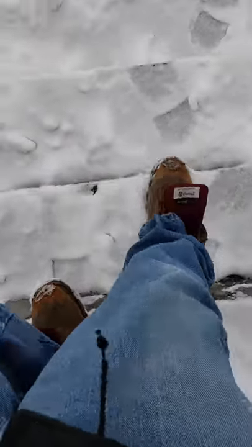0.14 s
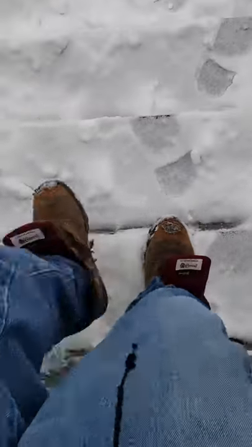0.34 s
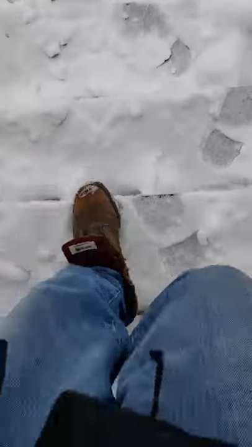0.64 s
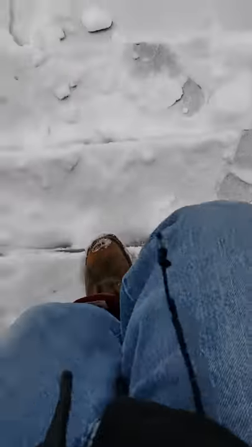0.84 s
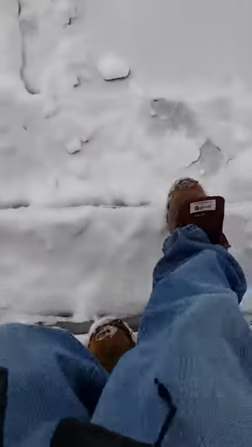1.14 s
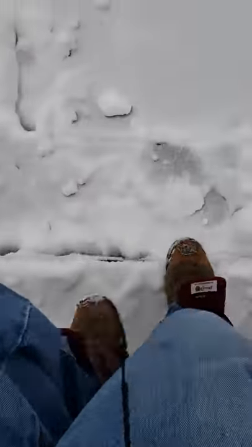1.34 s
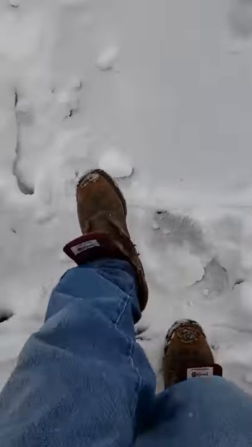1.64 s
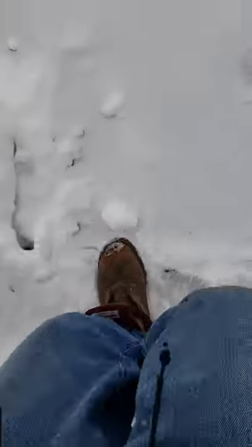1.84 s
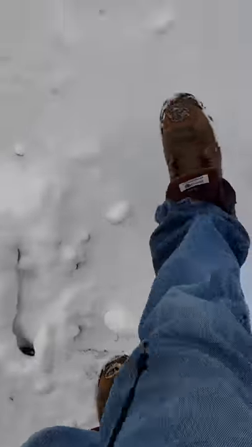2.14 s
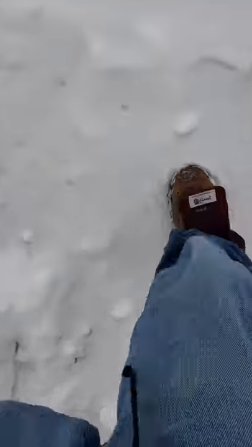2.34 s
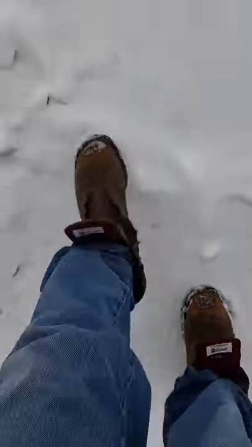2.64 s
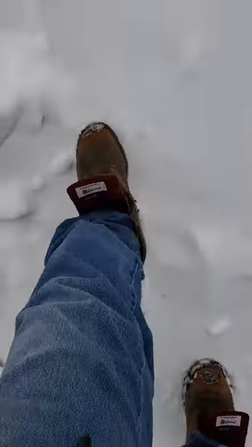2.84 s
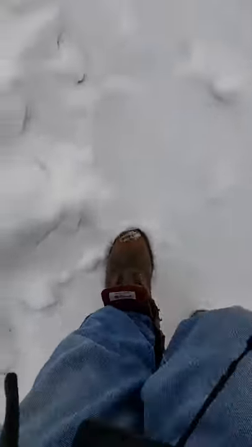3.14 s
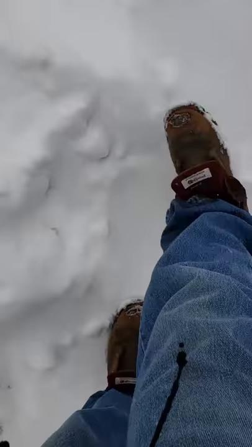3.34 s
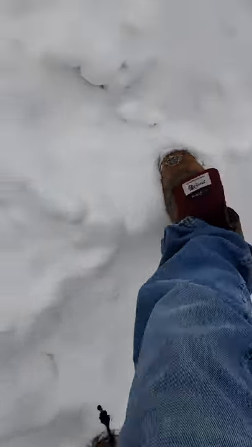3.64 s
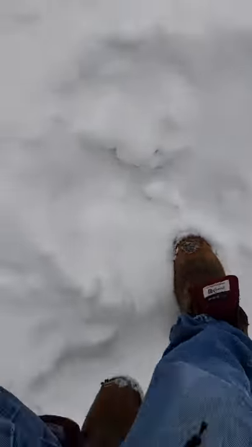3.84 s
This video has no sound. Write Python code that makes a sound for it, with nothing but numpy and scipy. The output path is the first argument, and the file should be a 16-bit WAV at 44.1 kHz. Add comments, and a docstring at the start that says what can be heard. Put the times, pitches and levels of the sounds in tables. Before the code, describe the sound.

Footsteps crunching in crusty snow, over low wind buffets and faint clinking keys.

```python
"""Boots crunch through snow: each step breaks the crust in single cracks and a dense crunch of grains.
Wind buffets the two microphone ports of a hand-held camera with low lumps of pressure.
Trouser legs swish, small keys clink in a pocket and a few sharp ticks sound close by,
all over a faint outdoor hiss."""
import sys
import numpy as np
from scipy import signal
from scipy.fft import rfft, irfft
from scipy.io import wavfile
from scipy.ndimage import uniform_filter1d

SR = 44100
rng = np.random.default_rng(int(sys.argv[2]) if len(sys.argv) > 2 else 0)


def store_wav(level_fs):
    """Save 16-bit WAV to argv[1]."""
    pcm = np.round(np.clip(np.atleast_2d(level_fs), -1, 1) * 32767)
    wavfile.write(sys.argv[1], SR, pcm.T.astype(np.int16))


N = 175518


def amp(db):
    """Decibels to gain."""
    return 10 ** (np.asarray(db) / 20)


def unit_rms(x):
    """Scales a signal to an rms of 1."""
    return x / np.sqrt(np.mean(x ** 2) + 1e-20)


def curve_at(points, hz):
    """Reads a curve along a log frequency axis."""
    point_hz, value = np.transpose(points)
    return np.interp(np.log(hz + 1), np.log(point_hz + 1), value)


def place(mix, start, sound, pan_db=0, lag_s=0):
    """Mixes a sound in; positive pan favours the left, positive lag delays the right."""
    panned = sound * amp([[pan_db / 2], [-pan_db / 2]])
    for channel, delay, part in zip(mix, (0, lag_s), panned):
        into = channel[max(round((start + delay) * SR), 0):][:len(part)]
        into += part[:len(into)]


# Stereo image of the noise beds. Each row: frequency in Hz, left-right likeness from 0 to 1.
LIKENESS = [(60, 0.12), (400, 0.79), (1000, 0.043), (4000, 0.029), (12000, 0.02)]

def patchy_noise(spectrum, patchy_db):
    """Coloured stereo noise whose level drifts in patches across time and frequency."""
    frames, hz = N // 256 + 5, np.fft.rfftfreq(1024, 1 / SR)
    a, b, c, d, patches = rng.standard_normal((frames, 513, 5)).T
    patches = uniform_filter1d(patches, size=12, axis=0)
    patches = unit_rms(uniform_filter1d(patches, size=10, axis=1))
    likeness = curve_at(LIKENESS, hz)[:, None]
    left = a + 1j * b
    right = likeness * left + np.sqrt(1 - likeness ** 2) * (c + 1j * d)
    colour = amp(curve_at(spectrum, hz)[:, None] + patchy_db * patches)
    _, noise = signal.istft(np.array([left, right]) * colour, nperseg=1024, noverlap=768)
    return unit_rms(noise[:, :N])


# Leg swings. Each row: start in seconds, length in seconds, level in dB.
SWISHES = [(-.05, 0.21, -56), (0.128, 0.22, -58.5), (0.4, 0.36, -61), (0.64, 0.4, -61), (0.99, 0.22, -63),
           (1.17, 0.45, -58), (1.727, 0.23, -60), (2.25, 0.19, -64), (2.527, 0.12, -68),
           (2.664, 0.27, -58.5), (2.9, 0.28, -60.5), (3.59, 0.21, -61.5), (3.913, 0.22, -60.5)]
# The bright tone of cloth on cloth. Each row: frequency in Hz, relative level in dB.
CLOTH_SPECTRUM = [(2500, 0.5), (5000, -2), (8500, -8), (10500, -5), (13500, -2.5), (15800, -12.5)]

def trouser_swish(skew=0.69, grit_db=2):
    """Each leg swing rubs the cloth in one gritty swell that peaks early."""
    t = np.arange(N) / SR
    swell = sum(amp(db) * np.sin(np.pi * np.clip((t - start) / length, 0, 1) ** skew)
                for start, length, db in SWISHES)
    grit = unit_rms(uniform_filter1d(rng.standard_normal(N), size=500))
    return swell * amp(grit_db * grit) * patchy_noise(CLOTH_SPECTRUM, patchy_db=0.7)


# The tone of the open air. Each row: frequency in Hz, relative level in dB.
AIR_SPECTRUM = [(15, -5), (25, 4.5), (64, 0), (107, -10), (299, -10), (380, -13.5), (977, -25.5),
                (1920, -27), (3120, -32), (6280, -30), (7580, -33), (8680, -40.5), (12300, -36.5),
                (15700, -39.5)]

def outdoor_hiss(level_db=-50):
    """A faint bed of air, heaviest in the bass."""
    return amp(level_db) * patchy_noise(AIR_SPECTRUM, patchy_db=0.6)


def eddy(hz, width_cycles=0.26):
    """One lump of pressure: a dip and a rebound."""
    cycles = np.arange(-1.5 * SR / hz, 1.5 * SR / hz) * hz / SR
    return np.sin(2 * np.pi * cycles - 0.5) * np.exp(-(cycles / width_cycles) ** 2 / 2)


def eddy_stream(times, db, hz, per_s, spread_db=4.5, spread_octaves=0.72):
    """Eddies hit each port on their own; their size follows the gust."""
    out = np.zeros((2, N))
    for when, big, pitch, side, flip in rng.random((round(2 * per_s * N / SR), 5)):
        at = when * N / SR
        lump = eddy(np.interp(at, times, hz) * 2 ** (spread_octaves * (2 * pitch - 1)))
        push = amp(-spread_db * np.log(big + 0.02)) * np.sign(flip - 0.3)
        one_port = np.outer([side < 0.5, side >= 0.5], lump)
        place(out, at - len(lump) / SR / 2, push * one_port)
    return unit_rms(out) * amp(np.interp(np.arange(N) / SR, times, db))


# The ride of the gusts. Each row: time in seconds, level of the large eddies in dB,
# their centre in Hz, small eddies against the large in dB.
GUSTS = [(0.0, -25.5, 112, -8), (0.03, -39.5, 96, -7.5), (0.08, -57.5, 96.5, 10.5), (0.15, -40, 96, -27),
         (0.202, -54.5, 121, 17), (0.36, -50, 101, -15), (0.76, -45, 117, -3.5), (.92, -49, 110, -8),
         (1.409, -41, 101, -26), (1.45, -111, 93.3, -8), (1.5, -78, 149, -8), (1.6, -51.5, 85, -28),
         (1.72, -56.5, 118, -18), (1.82, -34, 92, -30), (2.09, -56.5, 125, -11.5), (2.32, -34.5, 104, -9),
         (2.349, -43, 118, -3), (2.58, -49.5, 108, -53), (2.672, -35, 150, -3.5), (2.77, -37, 140, -6.5),
         (2.83, -35, 133, -21), (2.88, -64, 118, -5), (3.03, -33, 127, -10), (3.17, -44, 88, -30),
         (3.271, -41.5, 139, -3), (3.34, -47.5, 88, -24), (3.56, -45, 131, -7), (3.58, -55, 122, -16),
         (3.62, -45, 85, -12), (3.71, -51, 99, -16), (3.98, -47.5, 89, -6)]
# The hardest thumps. Each row: time in seconds, level in dB, pitch in Hz, pan in dB.
WIND_BUFFETS = [(0.009, -32.5, 73.6, -10), (0.518, -35.5, 68.6, 12), (1.001, -24, 93, -3),
                (1.027, -28, 196, -3), (1.197, -27.5, 70.6, 11.5), (1.267, -31, 116, -10),
                (1.312, -28.5, 72, -8), (1.396, -31.5, 73.5, 5), (1.798, -26, 84, -10.5),
                (1.908, -31, 102, 4), (1.998, -33.5, 66.5, -5), (2.263, -27.5, 118, 3),
                (2.296, -33, 98, -1), (2.655, -27, 108, -6), (2.674, -19, 169, 2), (2.712, -30, 160, -13),
                (3.015, -30.5, 127, 8), (3.107, -22, 133, 0), (3.178, -24.5, 111, 2), (3.282, -31, 143, -7),
                (3.487, -23.5, 138, 2.5), (3.542, -20, 124, 5.5)]

def wind():
    """Large eddies rumble on the ports, small ones flutter, and single buffets thump both."""
    times, gust_db, centre_hz, small_db = np.transpose(GUSTS)
    rumble = eddy_stream(times, gust_db, centre_hz, per_s=130)
    flutter = eddy_stream(times, gust_db + small_db, hz=np.full_like(times, 271), per_s=250)
    out = rumble + flutter
    for at, db, hz, pan_db in WIND_BUFFETS:
        lump = amp(db) * eddy(hz)
        place(out, at - len(lump) / SR / 3, lump, pan_db, lag_s=rng.normal(0.00016, 0.0022))
    return out


# The body of packed snow. Each row: multiple of the pitch, level in dB, 60 dB decay in seconds.
BODY_MODES = [(.7, -2, 0.013), (1.0, 3, 0.018), (1.4, 4.5, 0.009), (1.9, -2.5, 0.007), (2.4, -6, 0.0085)]
# Its brighter ring. Each row: frequency in Hz, level in dB, 60 dB decay in seconds.
BRIGHT_MODES = [(1888, 4, 0.0094), (2228, -1, 0.015), (2708, -2.5, 0.011), (3390, -9, 0.0064)]
SNOW_PAN_DB, SNOW_LAG_S = 0.5, 0.00005

def snow_ring(modes, scale, stretch, detune, rise_s=0.0017, phase_spread_rad=0.52):
    """Packed snow rings in damped modes, each a little out of phase between the ports."""
    t = np.arange(2600) / SR
    freq, db, t60 = np.transpose(modes)[:, :, None]
    is_main = abs(freq - 1) < 0.1
    t60 = t60 * np.where(is_main, stretch, min(stretch, 1))  # only the main mode can ring longer
    tune, start_phase, left, right = rng.standard_normal((4, len(modes), 1))
    phase = 2 * np.pi * scale * freq * (1 + detune * tune) * t + start_phase
    attack = np.minimum(t / rise_s / stretch, 1) ** 2
    envelope = attack * amp(db - 60 * t / t60)
    return np.array([(envelope * np.sin(phase + phase_spread_rad * port)).sum(0)
                     for port in (left, right)])


def snow_grain(pitch_hz, stretch=1, snap_s=0.0017, snap_hz=(3160, 6560)):
    """One break of the crust in three layers, each peaking at 1: body, bright ring, noisy snap."""
    body = snow_ring(BODY_MODES, pitch_hz, stretch, detune=0.05)
    bright = snow_ring(2 * BRIGHT_MODES, 1, min(stretch, 1), detune=0.095)  # each mode plays twice
    t = np.arange(body.shape[1]) / SR
    puff = rng.standard_normal(body.shape) * np.exp(-t / snap_s)
    snap = signal.lfilter(*signal.butter(3, snap_hz, "band", fs=SR), puff)
    return [layer / abs(layer).max() for layer in (body, bright, snap)]


# Single breaks. Each row: start in seconds, peak of the body in dB, bright ring and snap against
# the body in dB (before their trims), pitch in Hz, stretch factor of the ring time.
CRUST_CRACKS = [(0.008, -37, 3, -8, 570, 0.43), (0.043, -32.5, 2.5, -4, 1110, 0.87),
                (0.064, -35.5, 3, -21, 1000, 0.68), (0.084, -38.5, -3, -7, 510, 1.4),
                (0.104, -31, -1, -25, 484, 0.78), (0.129, -37, -4, -26, 630, 0.7),
                (0.148, -35.5, -1, -26, 685, 1.3), (0.156, -38.5, 2, -11, 920, 1.1),
                (0.175, -31, -1, -20, 677, 0.87), (0.197, -37, 0, -34, 714, 0.79),
                (0.205, -28, -30, -37, 467, 1.23), (0.378, -47, 2, -15, 940, 0.78),
                (0.585, -40.5, 4, -26, 786, 1.05), (0.603, -32, 4.5, -37, 740, 1.56),
                (0.625, -32.5, -4, -22, 650, 1.3), (0.641, -26.5, -4.5, -39, 674, 1.04),
                (0.665, -32.5, -5, -35, 720, 0.85), (0.684, -25, -3.5, -31, 522, 1.1),
                (0.715, -39, -22, -28, 860, .9), (0.728, -30, -25, -31, 860, 0.99),
                (0.787, -29.5, -9.5, -31, 670, 0.85), (0.856, -39, 11, 4, 606, 0.82),
                (1.024, -44.5, -30, -7, 726, 1.3), (1.129, -46, -3, -12, 859, 0.82),
                (1.143, -42.5, -4, -32, 1050, 1.05), (1.161, -23, -6.5, -29, 667, 1.56),
                (1.194, -24, -11.5, -34, 460, 0.64), (1.233, -25.5, -21, -32, 688, 1.4),
                (1.248, -31, -18, -32, 595, 1.5), (1.341, -31, -29, -27, 785, 1.2),
                (1.548, -49, -6, -29, 540, 1.1), (1.772, -39.5, -3, -10, 774, 1.03),
                (1.798, -30.5, -29, -33, 547, 0.9), (2.267, -23.5, -7.5, -30, 685, 0.71),
                (2.549, -40.5, -37, -9, 525, 1.44), (2.673, -35, -34, -35, 503, 0.68),
                (2.748, -49, -22, -30, 790, .9), (2.805, -32.5, -5, -13.5, 724, 1.01),
                (2.883, -34.5, -13, -27, 553, 1), (3.022, -35.5, -7, -35, 870, 0.75),
                (3.274, -42.5, 6, -1.5, 574, 1.4), (3.41, -56, -5, -22, 526, 1.1),
                (3.493, -40.5, -36, -37, 1010, 0.56), (3.559, -35.5, -16, -23, 625, 1.25),
                (3.583, -40.5, -27, -30, 640, 2.8), (3.632, -40.5, -12, -25, 793, 2.5),
                (3.664, -33.5, -9, -31, 600, 1.1), (3.67, -29.5, -11, -37, 665, 0.53),
                (3.68, -33.5, -2, -20, 640, 0.63), (3.688, -29.5, -6.5, -20, 600, 0.68),
                (3.723, -30, -8, -21, 740, 0.47), (3.731, -25.5, -5.5, -34, 613, 1.38),
                (3.824, -39.5, -27, -30, 557, 0.99), (3.865, -42, -24, -23, 593, 1.4),
                (3.931, -34.5, -10, -13, 615, 1.17)]

def crust_cracks(bright_trim_db=-2.5, snap_trim_db=2.5):
    """The crust gives way under the boot in loud single breaks."""
    out = np.zeros((2, N))
    for start, db, bright_db, snap_db, pitch_hz, stretch in CRUST_CRACKS:
        body, bright, snap = snow_grain(pitch_hz, stretch)
        crack = body + amp(bright_db + bright_trim_db) * bright + amp(snap_db + snap_trim_db) * snap
        place(out, start, amp(db) * crack, SNOW_PAN_DB, SNOW_LAG_S)
    return out


# A boot pressing down. Each row: start, rise and fall in seconds, level of the body in dB,
# bright ring and snap against the body in dB, pitch in Hz.
BOOT_PRESSES = [(.03, 0.011, 0.43, -56.5, -1.5, -8, 777), (0.129, 0.098, 0.042, -42.5, -6, -27, 732),
                (0.66, 0.0039, 0.039, -48, -1, -30, 810), (0.681, 0.029, 0.12, -45.5, -6.5, -15, 657),
                (.855, 0.0045, 0.038, -61.5, 4, 2, 616), (1.165, 0.016, 0.075, -46, -10, -26, 600),
                (1.221, 0.011, 0.12, -42.5, -10.5, -14.5, 626), (1.325, 0.018, 0.032, -44.5, -5, -11, 840),
                (1.765, 0.022, 0.083, -43, -9.5, -33, 578), (2.27, 0.051, 0.063, -48.5, -9, -18, 730),
                (2.665, 0.012, .11, -52.5, -32, -24, 420), (2.69, 0.058, 0.28, -65.5, -9, -3, 740),
                (2.875, 0.032, 0.12, -42, -11.5, -34, 586), (2.929, 0.024, 0.041, -40, -17.5, -19, 867),
                (3.16, 0.0069, 0.12, -65, 6.5, -1, 734), (3.55, 0.036, 0.072, -55.5, -9, -19, 606),
                (3.62, 0.0072, 0.14, -51.5, -6.5, -15, 790)]

def snow_crunch(grains_per_s=600, spread_db=1.5, variants=8):
    """Hundreds of small breaks a second swell and die with the pressure of the boot."""
    out, t = np.zeros((2, N)), np.arange(SR // 4) / SR  # each press is cut off after a quarter second
    for start, rise, fall, db, bright_db, snap_db, pitch_hz in BOOT_PRESSES:
        pressure = np.sin(np.pi / 2 * np.interp(t, [0, rise, rise + fall], [0, 1, 0])) ** 2
        big, chance, pick = rng.random((3, len(t)))
        breaks = pressure * amp(-spread_db * np.log(big + 0.054)) * (chance < grains_per_s / SR)
        breaks *= np.linalg.norm(pressure) / (np.linalg.norm(breaks) + 1e-9)
        for variant in range(variants):
            body, bright, snap = (layer / np.linalg.norm(layer[0]) for layer in snow_grain(pitch_hz))
            grain = amp(db) * (body + amp(bright_db) * bright + amp(snap_db) * snap)
            hits = breaks * ((pick * variants).astype(int) == variant)
            place(out, start, signal.oaconvolve(hits[None], grain, axes=1), SNOW_PAN_DB, SNOW_LAG_S)
    return out


# The ring of each key, by letter; "j" is the bright upper ring of the clinks near 3.05 s and 3.13 s, which also
# ring key "a". Each row: frequency in Hz, level in dB, 60 dB decay in seconds.
KEY_MODES = {"a": [(4278, 0, .26), (4250, -12, .3), (10710, -12, .05), (11450, -17, .06)],
             "b": [(7005, 0, .75), (6955, -10, .45)], "c": [(6397, 0, .16)], "d": [(4931, 0, .3),
             (9600, -6, .12)], "e": [(5306, 0, .45), (3685, -6, .3), (9491, -1, .08)],
             "f": [(5832, 0, .15)], "g": [(3680, 0, .2), (9200, -14, .2)], "h": [(9006, 0, .09),
             (8263, 0, .12), (10240, -5, .15)], "i": [(4050, 0, .14), (12100, -10, .1)],
             "j": [(10710, 0, .09), (11470, -5, .16), (13400, -8, .12), (14800, -6, .07)]}
# Clinks in the pocket. Each row: start in seconds, key letter, level in dB.
KEY_CLINKS = [(0.044, "i", -49.5), (0.076, "c", -61), (.125, "c", -68), (.195, "g", -62), (.347, "a", -48),
              (.4, "g", -65), (.452, "b", -73), (.458, "c", -58), (0.573, "b", -75), (0.626, "d", -63),
              (.705, "f", -61), (1.018, "c", -62), (1.045, "e", -68), (1.136, "b", -62), (1.164, "b", -64),
              (1.284, "b", -55), (1.324, "c", -56), (1.54, "c", -60), (1.754, "c", -56.5), (2.42, "e", -63),
              (2.518, "d", -64.5), (2.762, "h", -61), (3.045, "j", -63), (3.131, "j", -59),
              (1.21, "b", -66), (3.05, "a", -59.5), (3.088, "g", -60.5), (3.131, "a", -58.5),
              (3.196, "a", -77), (3.222, "d", -66), (3.265, "b", -72), (3.692, "f", -52)]

def pocket_keys(rise_s=0.0021, waver_db=3.5):
    """Each clink rings one key; the ring wavers as the keys swing."""
    out, t = np.zeros((2, N)), np.arange(SR // 2) / SR
    attack = np.minimum(t / rise_s, 1)
    for start, key, db in KEY_CLINKS:
        ring = sum(amp(mode_db - 60 * t / t60) * np.sin(2 * np.pi * hz * (start + t))
                   for hz, mode_db, t60 in KEY_MODES[key])
        waver = np.interp(t, np.linspace(0, t[-1], num=60), rng.standard_normal(60))
        clink = amp(db + waver_db * waver) * np.sqrt(2) * attack * ring
        place(out, start, clink, pan_db=3, lag_s=0.00002)
    return out


# Sharp ticks. Each row: start in seconds, peak in dB, pan in dB, decay time in seconds.
CLOSE_TICKS = [(0.766, -37, -2, 0.0012), (0.8286, -30, 2, 0.00077), (0.832, -21.5, -11.5, 0.00087),
               (0.858, -37.5, 17, 0.0021), (1.363, -35, 9, 0.002)]
# Their tone. Each row: frequency in Hz, relative level in dB.
TICK_SPECTRUM = [(180, -26), (300, 7), (2090, -5), (3490, -0.5), (6670, -13), (11000, -13), (15800, -19)]

def close_ticks():
    """Very short, wide-band snaps of noise close to the microphone."""
    out, t = np.zeros((2, N)), np.arange(512) / SR
    colour = amp(curve_at(TICK_SPECTRUM, np.fft.rfftfreq(512, 1 / SR)))
    for start, db, pan_db, decay_s in CLOSE_TICKS:
        noise = irfft(rfft(rng.standard_normal((2, 512))) * colour)
        tick = noise * np.exp(-t / decay_s)
        place(out, start, amp(db) * tick / abs(tick).max(1, keepdims=True), pan_db)
    return out


def scene():
    """All sources meet at the two ports."""
    beds = trouser_swish() + outdoor_hiss() + wind()
    return beds + crust_cracks() + snow_crunch() + pocket_keys() + close_ticks()


def record(dry):
    """The microphone rolls off the deep bass and cuts the very top."""
    low_cut = signal.butter(3, 42, "high", fs=SR)
    high_cut = signal.firwin(511, 15850, window=("kaiser", 9), fs=SR)
    return signal.oaconvolve(signal.lfilter(*low_cut, dry), high_cut[None], "same")


dry = scene()
out = record(dry)
store_wav(out)
```